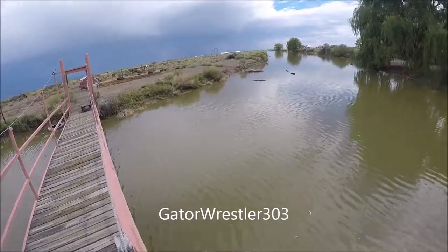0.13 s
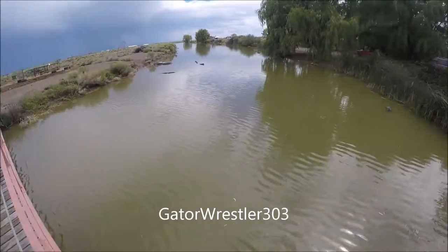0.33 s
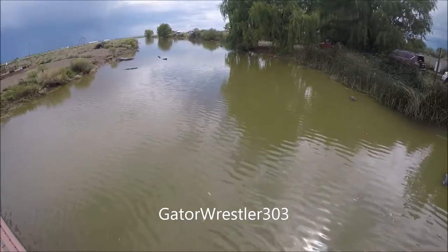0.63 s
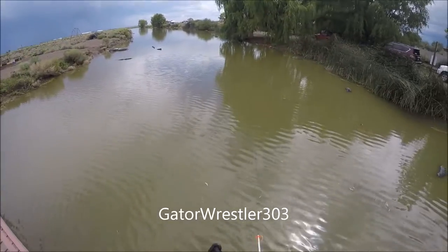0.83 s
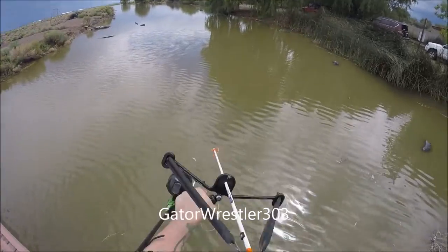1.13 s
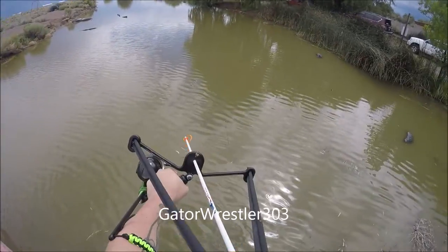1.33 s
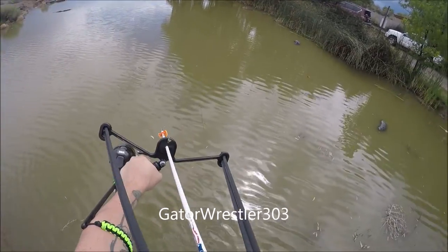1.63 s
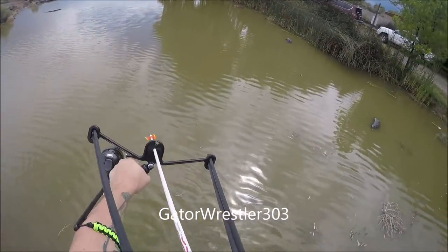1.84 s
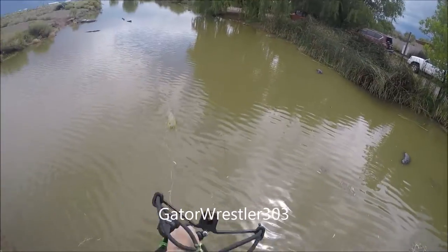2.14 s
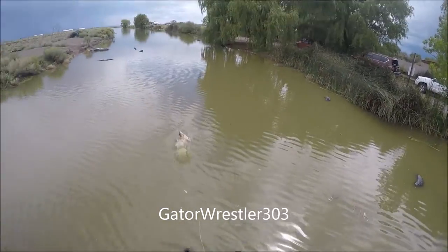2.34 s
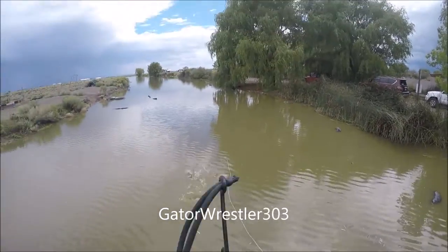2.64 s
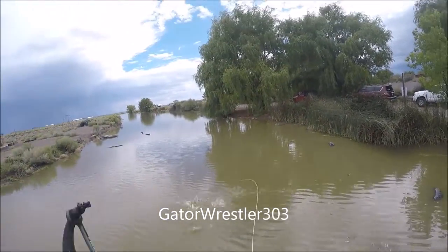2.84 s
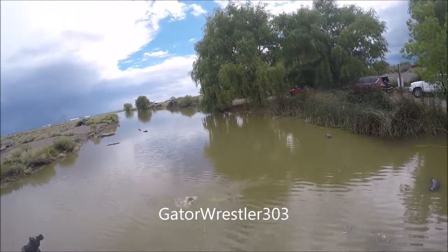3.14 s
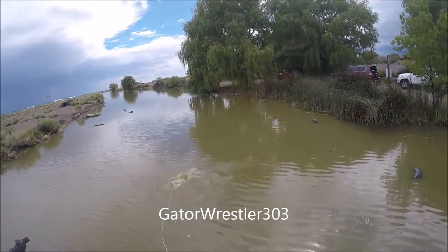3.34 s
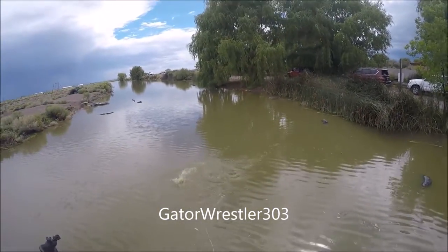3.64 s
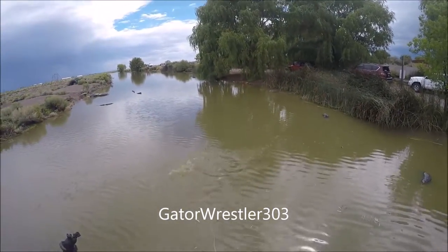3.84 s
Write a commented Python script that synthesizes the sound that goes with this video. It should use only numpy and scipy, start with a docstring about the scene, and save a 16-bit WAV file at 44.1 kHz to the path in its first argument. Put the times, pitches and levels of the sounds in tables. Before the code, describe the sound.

Bow release cracks loudly after faint creaks and scrapes, followed by gulping, spattering pond water.

```python
"""A bow is shot into a pond from a footbridge, heard from a small camera worn by the archer. Snap, knocks:
shaped noise in broad resonances; both set decaying sines (bow modes) ringing. Before it the arrow stutters over
its rest: grains of stick-slip; the bow creaks and the line hisses: clicks. Water churns and spatters (clicks,
ringing grains), slaps and deep gulps (noise bursts), gulps (gliding sines, noise). Wind buffets the microphone:
shaped noise under gust curves. Faint: thin chirps, a hiss, a rising tone."""
import sys
import numpy as np
from scipy import signal
from scipy.fft import rfft, irfft, next_fast_len
from scipy.io import wavfile
from scipy.ndimage import uniform_filter1d

SR = 44100
rng = np.random.default_rng(int(sys.argv[2]) if len(sys.argv) > 2 else 0)


def store_pcm(level_fs):
    """Save levels as 16-bit WAV."""
    pcm = np.round(np.clip(level_fs, -1, 1) * 32767).astype(np.int16)
    wavfile.write(sys.argv[1], SR, np.atleast_2d(pcm).T)


N = 176400

# Wind: pressure rumble, flutter, open-air hush spectra [f/Hz, relative level/dB]
RUMBLE_SPECTRUM = [(12, -10.5), (28, 1.5), (50, -4), (80, -11.5), (120, -22.5), (250, -51), (600, -87)]
FLUTTER_SPECTRUM = [(50, -11.5), (110, 2.5), (180, -5), (300, -18), (600, -32), (1500, -58), (4000, -88)]
AIR_SPECTRUM = [(100, 0), (1000, -3.5), (2000, -11.5), (5000, -15.5), (9000, -16), (15000, -11)]
# Gusts on the microphone [t/s, level/dB, half length/s]
GUSTS = [(0.167, -26.5, 0.24), (0.424, -23.5, 0.066), (0.531, -19, 0.095), (1.079, -25.5, 0.12),
         (2.127, -24, 0.085), (2.564, -21, 0.082), (2.879, -26.5, .05), (3.364, -20.5, 0.098),
         (3.51, -14, 0.022), (3.618, -20, 0.04), (3.722, -13, 0.026), (3.79, -16, .03), (3.868, -24, 0.058)]
# Breeze between gusts [t/s, level/dB]
BREEZE_LEVEL = [(.8, -40), (1.4, -45.5), (1.95, -43), (2.2, -30), (3.1, -37.5), (4.0, -33.5)]
AIR_DB, FLUTTER_DB, FLUTTER_EXPONENT = -56.5, -1.5, 1.6

# Faint narrow hiss, then a clear rising tone at the end
HISS_S, HISS_DB, HISS_HZ, HISS_HALF_S, HISS_Q = 0.42, -58.5, 1550, 0.2, 8.6
TONE_S, TONE_DB, TONE_HZ, TONE_HALF_S, TONE_OCT_PER_S = 3.998, -36, 717, 0.031, 4.5

# Thin chirps, perhaps a far bird [end t/s, level/dB, length/s]
CHIRPS = [(.175, -62, .035), (.864, -53.5, 0.054), (1.572, -59, .025)]
CHIRP_TOP_HZ, CHIRP_ARC_S, CHIRP_THROAT_HZ, CHIRP_WIDTH_HZ = 1040, 0.075, 4500, 1000

# Large air pockets [t/s, level/dB, pitch at t/Hz, decay/s]
GULPS = [(2.191, -29.5, 742, 0.013), (2.223, -27, 330, 0.011), (2.25, -36, 380, 0.016),
         (2.299, -35.5, 310, 0.0094), (2.317, -30, 460, 0.0058), (2.333, -37, 600, .008),
         (2.44, -36.5, 480, 0.0088), (3.41, -33, 400, 0.019)]
GULP_RISE_OCT_PER_S, GULP_ATTACK_S = 4, 0.005
GULP_Q, GULP_NOISE_DB, GULP_TONE_DB = 2.3, -5.5, -2

# Slaps of water, and a few deep broad gulps near 400-550 Hz, before softening [t/s, level/dB, centre f/Hz,
# decay/s]
SLAPS = [(2.36, -25, 900, 0.0026), (2.465, -26.5, 1110, 0.0087), (2.483, -33, 1800, 0.0035),
         (2.646, -31, 3500, 0.0057), (2.749, -27, 3500, 0.005), (2.877, -27, 410, .012),
         (2.911, -31, 540, .005), (2.974, -32.5, 495, 0.012), (3.049, -35, 1280, 0.015),
         (3.255, -32, 1300, 0.024), (3.29, -29.5, 2570, 0.0049), (3.373, -21.5, 1240, 0.0034),
         (3.554, -31.5, 1180, 0.005)]
SLAP_RISE_CYCLES, SLAP_Q, SLAP_LOWPASS_HZ = 1.16, 2.36, 4800

# Splash surges, before trims [t/s, fine spray level/dB, pattering drops level/dB]
SPLASH_LEVELS = [(2.2, -51, -45.5), (2.33, -53.5, -53.5), (2.39, -64.5, -59), (2.47, -50, -45.5),
                 (2.58, -53, -47), (2.68, -49, -46), (2.83, -53, -42.5), (2.95, -59.5, -53.5),
                 (3.15, -54, -49), (3.27, -49, -48.5), (3.45, -58, -50), (3.57, -54, -50.5),
                 (3.83, -67.5, -59)]
# Bubbling near 1.2 kHz, before trim [t/s, level/dB]
FROTH_LEVEL = [(2.2, -8), (2.7, -6), (3.05, -0.5), (3.85, 0.5), (4.0, -9)]
# Fine spray spectrum [f/Hz, relative level/dB]
SPRAY_SPECTRUM = [(2000, -11), (4000, 2.5), (5800, 7.5), (8000, -2), (15000, -9.5)]
WATER_FULL_S, WATER_RISE_S = 2.18, 0.014
SPRAY_TRIM_DB, PATTER_TRIM_DB, FROTH_TRIM_DB, CHURN_DB = 2, 0.5, -43.5, -50.5

# Line hiss spectrum [f/Hz, relative level/dB]
LINE_SPECTRUM = [(200, 1), (1100, 6), (2400, -8), (4000, 3.5), (6000, 9), (8500, -7.5), (10800, 1.5),
                 (13000, -1.5)]
LINE_START_S, LINE_STOP_S, LINE_RISE_S, LINE_DECAY_S = 2.052, 2.165, 0.0079, 0.029
LINE_DB, LINE_FLICKS_PER_S = -28.5, 1400

# Arrow catching on its rest [t/s, level/dB, length/s]
REST_CATCHES = [(0.438, -52, 0.0072), (0.479, -50, 0.0036), (0.504, -53.5, 0.015), (0.545, -54, .005),
                (.708, -58, 0.0095), (.787, -47, 0.003), (0.798, -47, 0.011), (0.858, -46, 0.009),
                (.893, -53, 0.014), (0.931, -51, 0.0037), (.962, -57, 0.0073)]
# Arrow sliding over the rest [t/s, level/dB]
SLIDE_LEVEL = [(.93, -67), (1.0, -55), (1.22, -47.5), (1.4, -53.5), (1.55, -61.5), (1.85, -91)]
# Bow creaking near full draw [t/s, level/dB]
CREAK_LEVEL = [(1.0, -88), (1.35, -61), (1.52, -51.5), (1.75, -56.5), (1.86, -79), (2.0, -62)]
# Creak spectrum [f/Hz, relative level/dB]
CREAK_SPECTRUM = [(700, 1), (1500, -6), (3000, -6.5), (6000, -7.5), (9000, -20), (15000, -10.5)]
SLIPS_PER_S, CREAKS_PER_S = 1100, 900

# Clicks and knocks of string, arrow and line around the bow
# [t/s, level/dB, centre f/Hz, rise/s, decay/s]
KNOCKS = [(1.502, -42.5, 3000, 0.0011, 0.0037), (2.009, -27.5, 1990, 0.00058, 0.0025),
          (2.0138, -8.5, 6000, 0.00064, 0.0013), (2.0206, -25, 6500, 0.0013, 0.0043),
          (2.028, -30, 2200, 0.00065, 0.0054), (2.0425, -1, 7250, 0.00025, 0.00052),
          (2.049, -18, 4500, 0.00046, 0.0017), (2.062, -29, 2010, 0.0024, 0.0046),
          (2.083, -15, 3000, 0.00019, 0.00091), (2.108, -26.5, 1490, 0.0022, 0.0037),
          (2.1727, -20.5, 1150, 0.0026, 0.0056), (2.174, -24, 400, .003, .005),
          (2.1724, -17.5, 6000, 0.0013, 0.0023)]
# String snap spectrum [f/Hz, relative level/dB]
SNAP_SPECTRUM = [(100, -14), (300, -10), (540, -3), (800, -11), (1050, -5), (1800, -2.5), (2400, -12.5),
                 (5000, -13.5), (15000, -34)]
# Bow modes [f/Hz, level re blow/dB, t60/s]
BOW_MODES = [(380, -6, 0.021), (524, -3.5, 0.065), (666, -4.5, 0.065), (969, -1, 0.095), (1069, -5, 0.11),
             (1285, -11, 0.08), (1405, -5, 0.035), (1817, -7.5, .045), (1920, -7, 0.033),
             (2420, -16, 0.065), (2925, -18, 0.1), (6080, -17, 0.061)]
KNOCK_Q = 1.86
SNAP_S, SNAP_DB, SNAP_RISE_S, SNAP_HOLD_S, SNAP_DECAY_S = 2.0402, -6, 0.0016, 0.0027, 0.0035
SNAP_BLOW_DB, KNOCK_BLOW_DB = -10, -20  # drive into the modes; knocks relative to their own level

# Camera case response [f/Hz, gain/dB]
CASE_RESPONSE = [(2500, 1), (3100, 2), (3400, -9), (3750, -7.5), (4200, -1.5), (6300, 0.5), (7000, -7),
                 (7600, -8.5), (9300, -12), (10700, -9), (12300, -16.5), (14700, -18.5)]
START_S, START_FADE_S, CUTOFF_HZ = 0.102, 0.00095, 15700


def from_db(db):
    """Decibels to amplitude gain."""
    return 10 ** (np.asarray(db) / 20)


def rms_one(x):
    """Scale to unit RMS."""
    return x / np.sqrt(np.mean(x ** 2) + 1e-20)


def clock():
    """Time of every sample, s."""
    return np.arange(N) / SR


def white():
    """White Gaussian noise."""
    return rng.standard_normal(N)


def gains(rows):
    """One gain curve per dB column, interpolated in dB."""
    s, *columns = np.transpose(rows)
    return [from_db(np.interp(clock(), s, column)) for column in columns]


def colour(x, points):
    """Minimum-phase filter through (Hz, dB) points, via the folded cepstrum."""
    size = next_fast_len(N + SR // 4) * 2
    hz, db = np.transpose(points)
    bin_hz = np.arange(size // 2 + 1) * SR / size
    bin_db = np.interp(np.log(bin_hz + 1), np.log(hz), db)
    cepstrum = irfft(np.log(from_db(bin_db)))
    cepstrum[1:size // 2] *= 2
    cepstrum[size // 2 + 1:] = 0
    response = np.exp(rfft(cepstrum))
    return irfft(rfft(x, size) * response)[:N]


def ring(x, hz, t60_s):
    """Two-pole resonator: a unit click starts a unit sine that falls 60 dB in t60_s."""
    r = from_db(-60 / (t60_s * SR))
    w = 2 * np.pi * hz / SR
    return signal.lfilter([0, np.sin(w)], [1, -2 * r * np.cos(w), r * r], x + 1e-18)


def swell(s, rise_s, hold_s, decay_s):
    """Gaussian attack up to s, hold, exponential release."""
    t = clock() - s
    attack = (np.minimum(t, 0) / rise_s) ** 2
    release = np.maximum(t - hold_s, 0) / decay_s
    return np.exp(-np.minimum(attack + release, 40))


def hump(s, half_s):
    """Gaussian rise and fall around s."""
    return np.exp(-((clock() - s) / half_s) ** 2)


def even(x, window_s):
    """Divide by the running RMS to hold the level steady."""
    power = uniform_filter1d(x * x, max(int(window_s * SR), 2))
    return x / np.sqrt(np.abs(power) + 1e-12)


def clicks(per_s, spread_db):
    """Random clicks of either sign and uneven size."""
    sizes = from_db(spread_db * np.minimum(rng.exponential(1, N), 4))
    signs = rng.choice([-1, 1], N)
    return sizes * signs * (rng.random(N) < per_s / SR)


def clumps(per_s, depth_db):
    """Gain wandering between random dB values, per_s of them a second."""
    steps = np.clip(rng.standard_normal(1000), -2, 2)
    return from_db(depth_db * np.interp(clock() * per_s, np.arange(1000), steps))


def burst(envelope, hz, q):
    """Noise in one resonance under an envelope, with the energy of that envelope."""
    b, a = signal.iirpeak(min(hz, SR / 4), max(q, hz / SR * 4), fs=SR)
    x = envelope * signal.lfilter(b, a, white())
    return x * np.sqrt(np.sum(envelope ** 2) / np.sum(x ** 2))


def glide(s, hz, oct_per_s):
    """Sine sliding through hz at s, within an octave either way."""
    pitch_hz = hz * 2 ** np.clip(oct_per_s * (clock() - s), -1, 1)
    return np.sin(2 * np.pi * (np.cumsum(pitch_hz) / SR + rng.random()))


def grains(low_hz, high_hz, per_s, cycles, spread_db, count=16):
    """Clicks dealt among pitched resonators, each falling 60 dB in the given cycles."""
    born = clicks(per_s, spread_db)
    dealt = rng.integers(0, count, N)
    pitches_hz = np.geomspace(low_hz, high_hz, count)
    cloud = sum(ring(born * (dealt == k), hz, cycles / hz) for k, hz in enumerate(pitches_hz))
    return even(cloud, window_s=0.094)


def background():
    """Faint narrow noise hiss, and a clear sine rising in pitch."""
    hiss = from_db(HISS_DB) * burst(hump(HISS_S, HISS_HALF_S), HISS_HZ, HISS_Q)
    tone = hump(TONE_S, TONE_HALF_S) * glide(TONE_S, TONE_HZ, TONE_OCT_PER_S)
    return hiss + from_db(TONE_DB) * tone


def wind():
    """Slow pressure swings on the port, flutter growing faster than the gusts, steady open-air hush."""
    gust_power = sum((from_db(db) * hump(s, half_s)) ** 2 for s, db, half_s in GUSTS)
    force = np.sqrt(gains(BREEZE_LEVEL)[0] ** 2 + gust_power)
    rumble = force * even(colour(white(), RUMBLE_SPECTRUM), window_s=0.093)
    flutter = force ** FLUTTER_EXPONENT * even(colour(white(), FLUTTER_SPECTRUM), window_s=0.1)
    air = rms_one(colour(white(), AIR_SPECTRUM))
    return rumble + from_db(FLUTTER_DB) * flutter + from_db(AIR_DB) * air


def chirps():
    """Pitch arcs up to each chirp's end, sweeping overtones through one high resonance."""
    out = 0
    for end_s, db, length_s in CHIRPS:
        pitch_hz = CHIRP_TOP_HZ * hump(end_s, CHIRP_ARC_S)
        phase = 2 * np.pi * np.cumsum(pitch_hz) / SR
        overtones = 0
        for k in range(1, 10):
            throat = np.exp(-((k * pitch_hz - CHIRP_THROAT_HZ) / CHIRP_WIDTH_HZ) ** 2)
            overtones = overtones + throat * np.sin(k * phase)
        envelope = hump(end_s - length_s / 2, length_s / 2) ** 2
        out = out + from_db(db) * envelope * overtones
    return out * clumps(300, depth_db=3)


def gulps():
    """Trapped air pockets burble (noise) and ring (sine), rising in pitch as they near the surface."""
    out = 0
    for s, db, hz, decay_s in GULPS:
        envelope = from_db(db) * swell(s, GULP_ATTACK_S, 0, decay_s)
        tone = envelope * glide(s, hz, GULP_RISE_OCT_PER_S)
        burble = burst(envelope, hz, GULP_Q)
        out = out + from_db(GULP_TONE_DB) * tone + from_db(GULP_NOISE_DB) * burble
    return out


def slaps():
    """Sheets of water fall back on the surface, and a few deep air pockets burble: resonant noise bursts,
    softened by a low-pass."""
    hits = 0
    for s, db, hz, decay_s in SLAPS:
        envelope = swell(s, SLAP_RISE_CYCLES / hz, 0, decay_s)
        hits = hits + from_db(db) * burst(envelope, hz, SLAP_Q)
    b, a = signal.butter(1, SLAP_LOWPASS_HZ, fs=SR)
    return signal.lfilter(b, a, hits)


def splash():
    """Spray clicks, pattering drops, frothing bubbles and deeper churn, each level wandering in clumps."""
    spray_gain, patter_gain = gains(SPLASH_LEVELS)
    froth_gain, = gains(FROTH_LEVEL)
    spray = spray_gain * even(colour(clicks(2200, spread_db=4.5), SPRAY_SPECTRUM), window_s=0.051)
    patter = patter_gain * grains(1430, 3500, per_s=1000, cycles=7.4, spread_db=3)
    drops = from_db(SPRAY_TRIM_DB) * spray + from_db(PATTER_TRIM_DB) * patter
    drops = drops * clumps(50, depth_db=3)
    froth = froth_gain * grains(1028, 1340, per_s=600, cycles=47, spread_db=3.5)
    froth = from_db(FROTH_TRIM_DB) * froth * clumps(40, depth_db=2)
    churn = grains(297, 940, per_s=400, cycles=13.2, spread_db=5.5)
    churn = from_db(CHURN_DB) * churn * clumps(30, depth_db=4)
    onset = np.clip((clock() - WATER_FULL_S) / WATER_RISE_S + 1, 0, 1)
    return (drops + froth + churn) * onset


def line():
    """The line whips out of the reel in rapid flicks (coloured clicks), then dies away."""
    flicks = even(colour(clicks(LINE_FLICKS_PER_S, spread_db=3), LINE_SPECTRUM), window_s=0.021)
    envelope = swell(LINE_START_S, LINE_RISE_S, LINE_STOP_S - LINE_START_S, LINE_DECAY_S)
    return from_db(LINE_DB) * envelope * flicks * clumps(200, depth_db=1.5)


def draw():
    """The shaft sticks and slips over the rest (ringing grains); the loaded bow creaks (clicks, noise)."""
    catches = sum(from_db(db) * swell(s, 0.00077, length_s, 0.0017) for s, db, length_s in REST_CATCHES)
    rub = catches + gains(SLIDE_LEVEL)[0]
    slips = grains(1950, 3200, per_s=SLIPS_PER_S, cycles=14, spread_db=3)
    shaft = even(slips, window_s=0.012)
    cracks = clicks(CREAKS_PER_S, spread_db=5.5) + 0.11 * white()
    creak = even(colour(cracks, CREAK_SPECTRUM), window_s=0.048)
    return rub * shaft + gains(CREAK_LEVEL)[0] * creak


def shot():
    """Knocks and the string's snap: noise bursts whose blows set the bow modes ringing."""
    blows = np.zeros(N)
    blows[int(SNAP_S * SR)] = from_db(SNAP_BLOW_DB)
    knocks = 0
    for s, db, hz, rise_s, decay_s in KNOCKS:
        knocks = knocks + from_db(db) * burst(swell(s, rise_s, 0, decay_s), hz, KNOCK_Q)
        blows[int(s * SR)] += from_db(db + KNOCK_BLOW_DB)
    snap_envelope = swell(SNAP_S, SNAP_RISE_S, SNAP_HOLD_S, SNAP_DECAY_S)
    snap = snap_envelope * even(colour(white(), SNAP_SPECTRUM), window_s=0.0028)
    modes = 0
    for k, (hz, db, t60_s) in enumerate(BOW_MODES):
        modes = modes + (-1) ** k * from_db(db) * ring(blows, hz, t60_s)  # alternating polarity
    return knocks + from_db(SNAP_DB) * snap + modes


def scene():
    """All sources summed at one microphone."""
    surroundings = background() + wind() + chirps()
    water = gulps() + slaps() + splash()
    bow = line() + draw() + shot()
    return (surroundings + water + bow)[None]


def record(dry):
    """Case coloration, clipped peaks, silence before START_S, steep low-pass."""
    x = np.clip(colour(dry[0], CASE_RESPONSE), -1, 1)
    x = x * np.clip((clock() - START_S) / START_FADE_S, 0, 1)
    lowpass = signal.ellip(10, 0.2, 80, CUTOFF_HZ, fs=SR, output="sos")
    return signal.sosfilt(lowpass, x)[None]


dry = scene()
out = record(dry)
store_pcm(out)
```